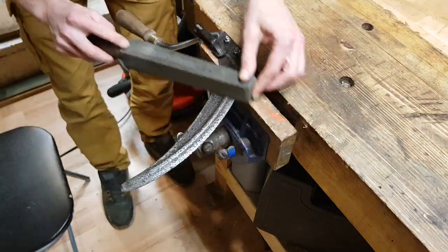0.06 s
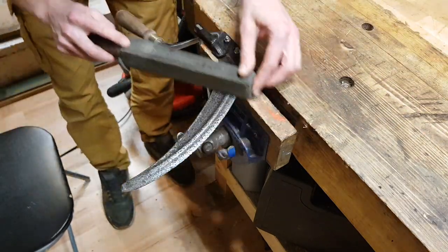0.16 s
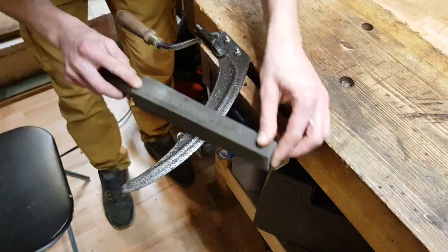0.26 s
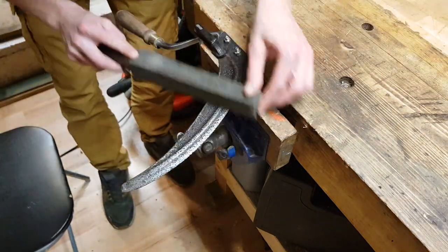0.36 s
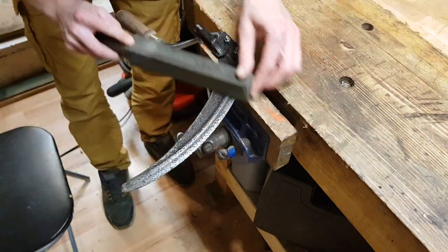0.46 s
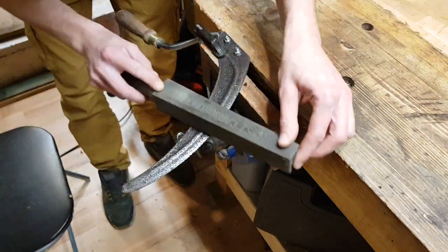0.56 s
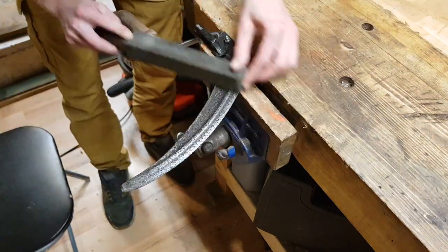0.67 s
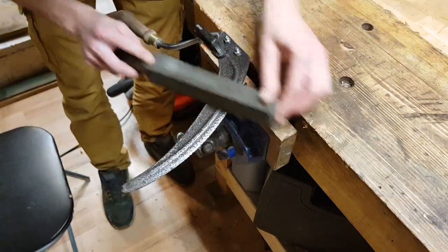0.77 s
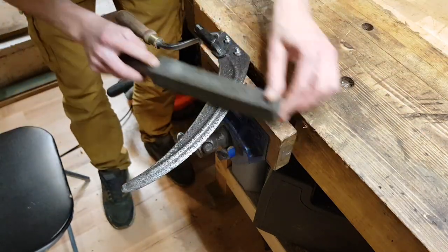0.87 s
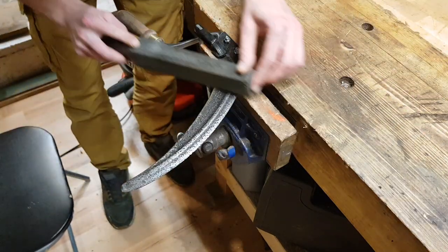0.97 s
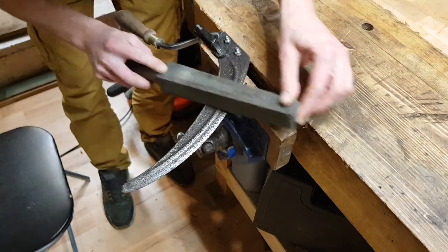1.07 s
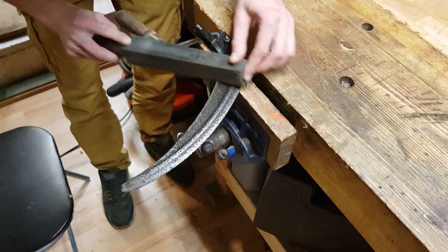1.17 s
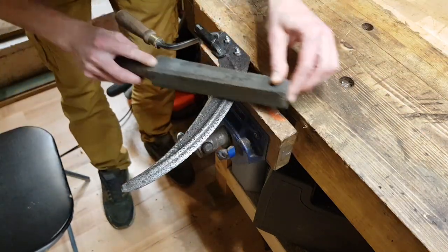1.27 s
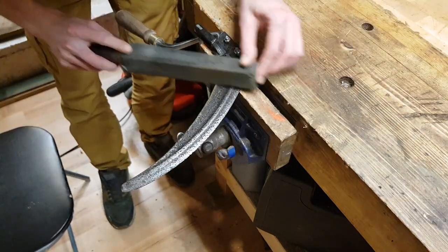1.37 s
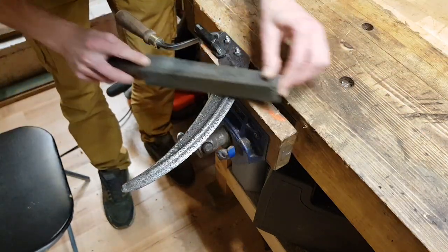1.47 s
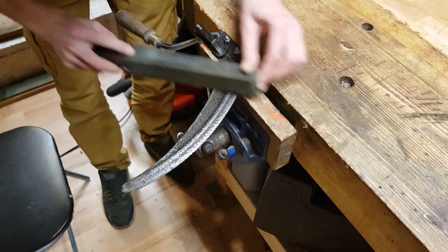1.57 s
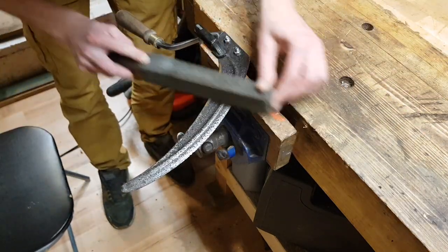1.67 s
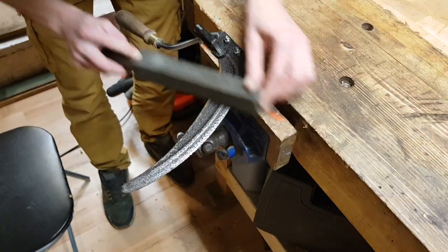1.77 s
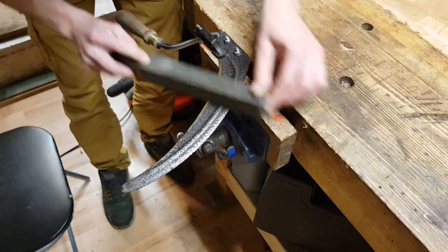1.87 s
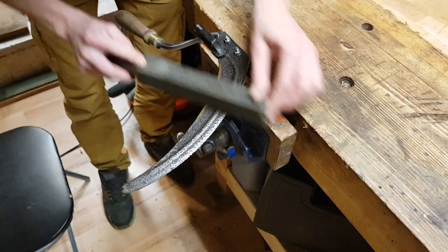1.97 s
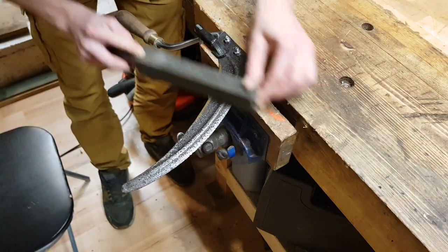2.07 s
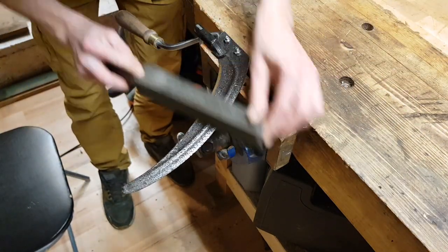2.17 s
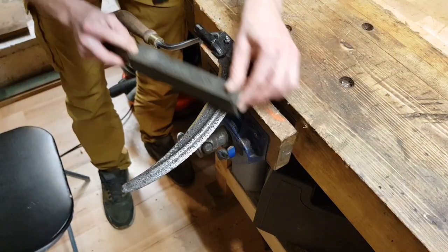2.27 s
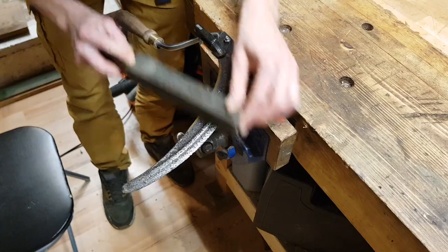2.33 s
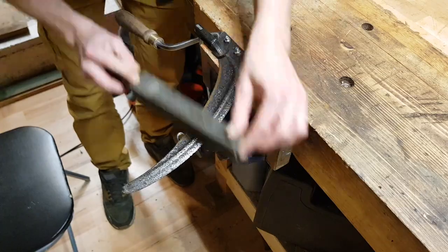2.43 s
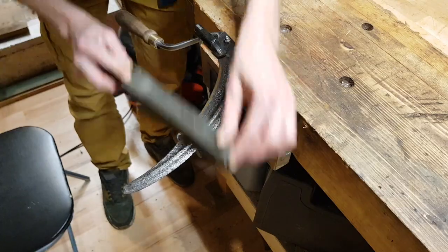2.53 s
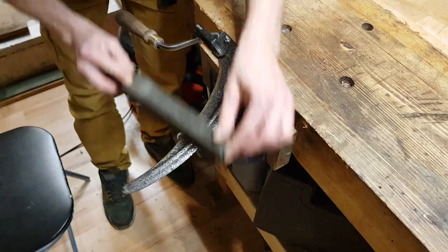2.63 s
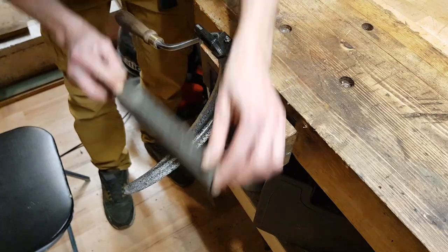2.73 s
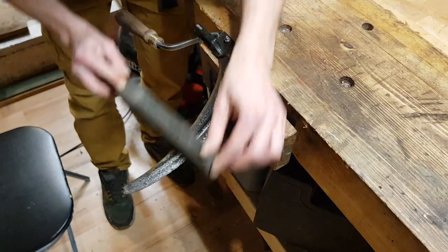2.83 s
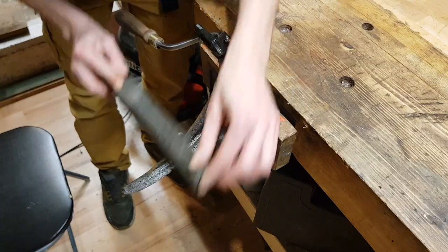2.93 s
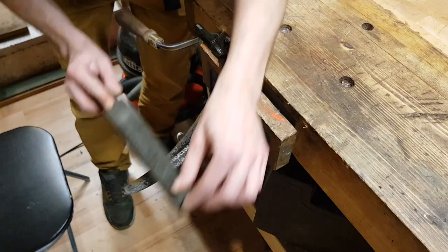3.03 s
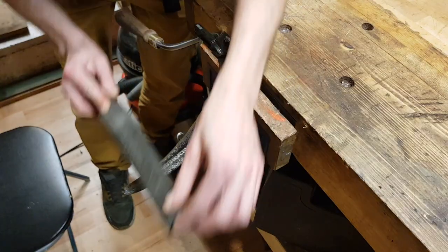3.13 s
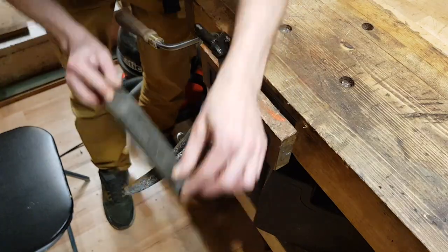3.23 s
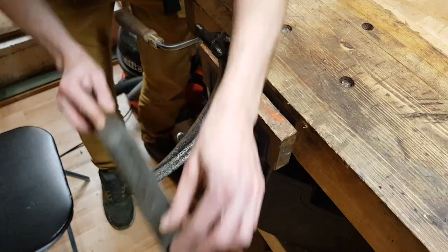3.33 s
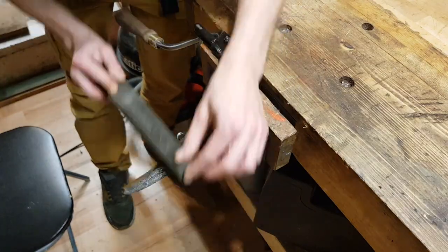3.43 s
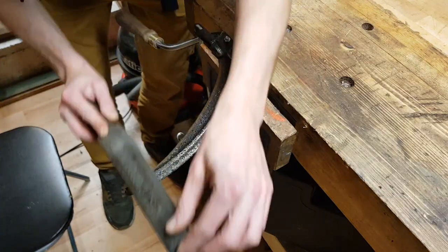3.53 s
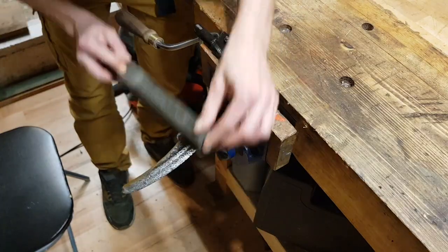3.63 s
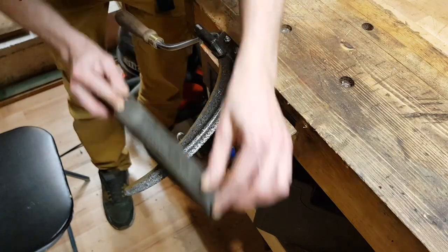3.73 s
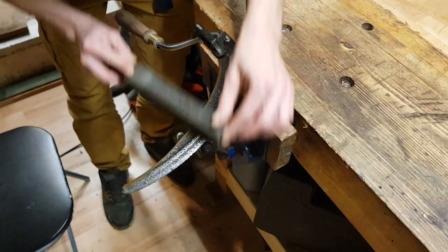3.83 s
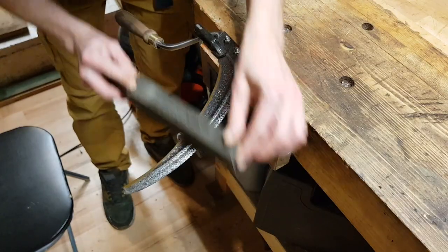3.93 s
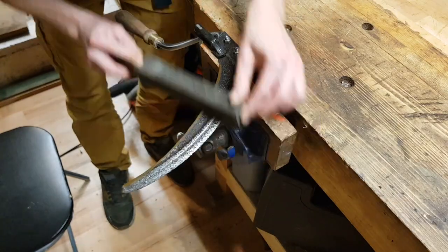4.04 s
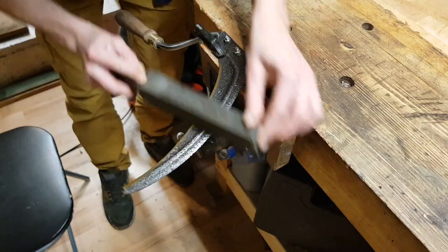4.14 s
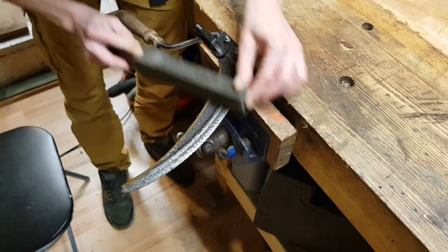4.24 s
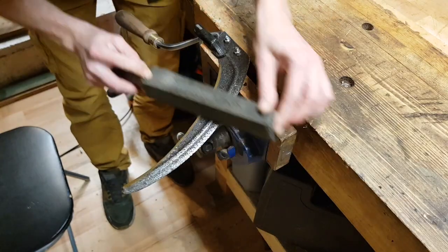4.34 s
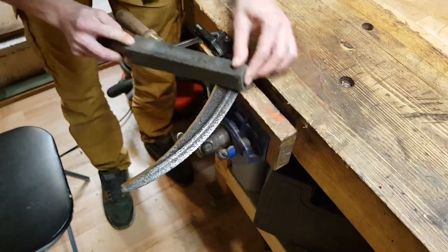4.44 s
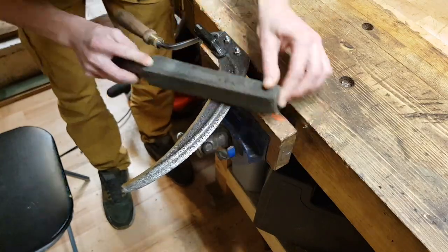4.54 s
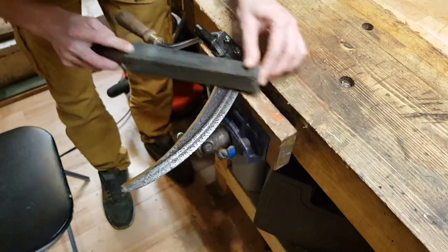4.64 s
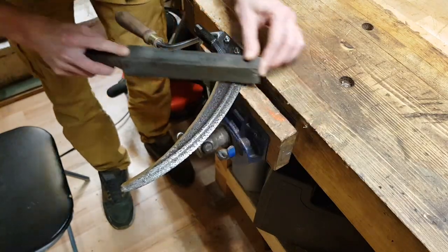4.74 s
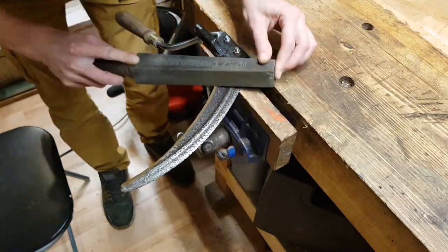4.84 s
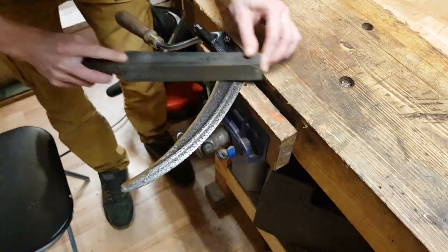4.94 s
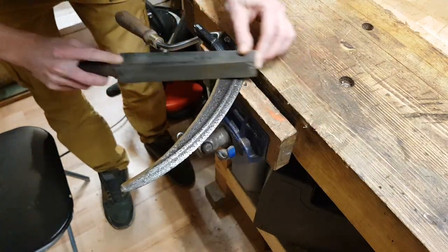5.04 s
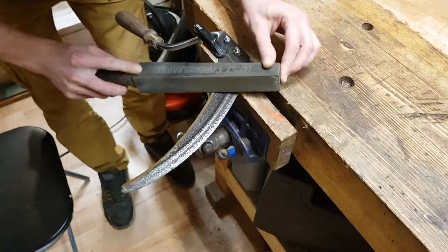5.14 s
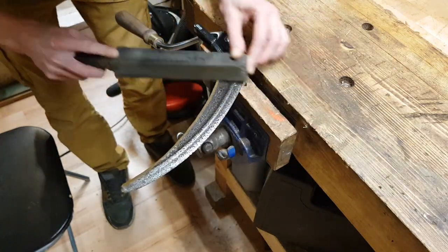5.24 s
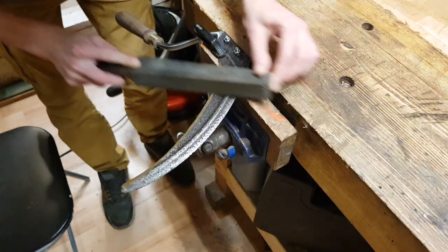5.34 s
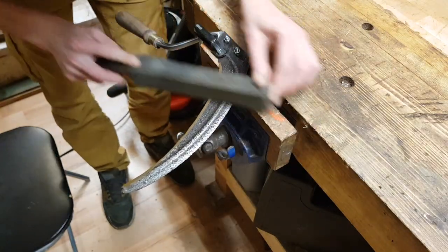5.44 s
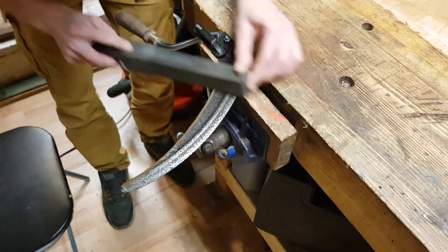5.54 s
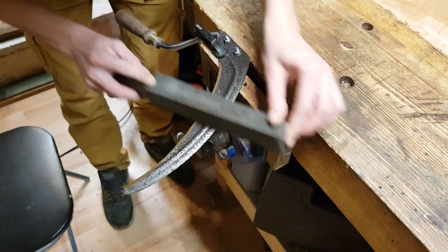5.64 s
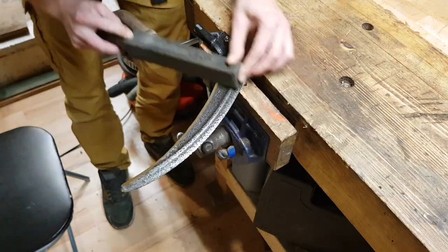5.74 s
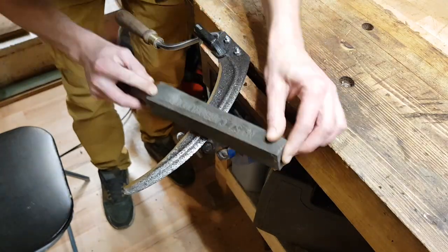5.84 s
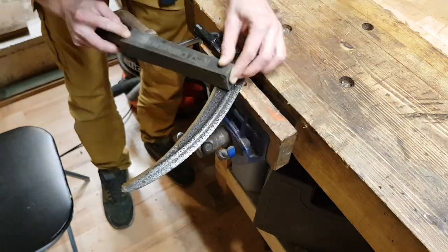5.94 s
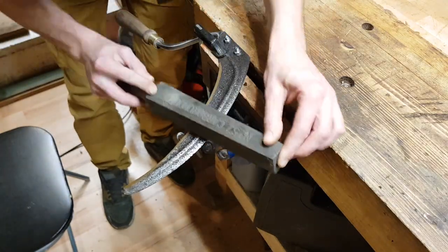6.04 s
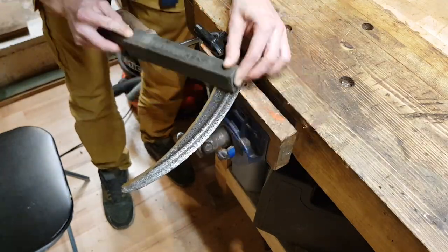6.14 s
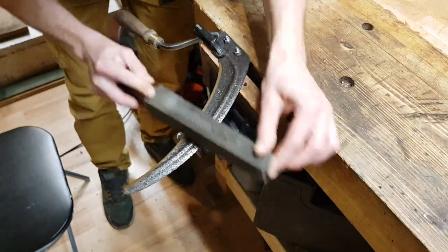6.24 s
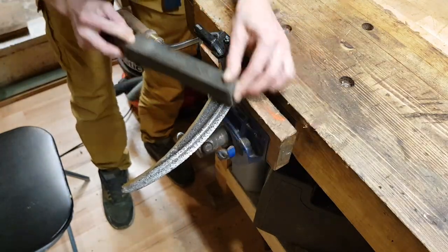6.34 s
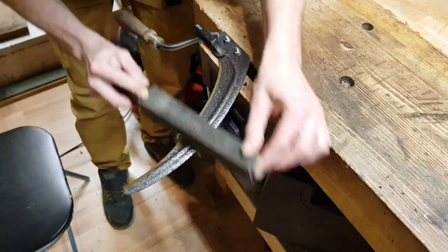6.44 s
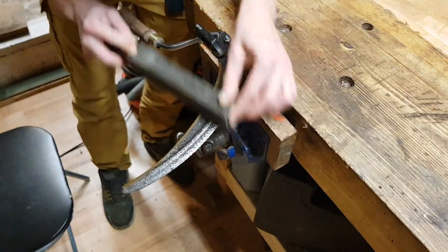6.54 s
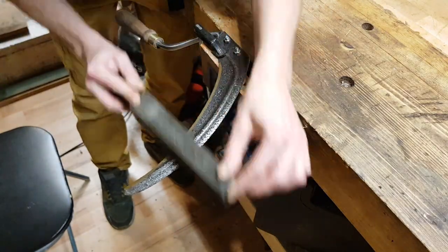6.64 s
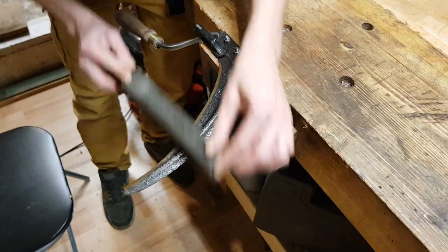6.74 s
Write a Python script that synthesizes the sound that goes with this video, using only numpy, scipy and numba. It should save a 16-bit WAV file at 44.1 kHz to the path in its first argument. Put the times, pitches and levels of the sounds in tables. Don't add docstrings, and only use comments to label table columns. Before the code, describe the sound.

A sharpening stone rasps quickly to and fro on a curved steel blade, bright and gritty, after a couple of small knocks in a quiet workshop.

```python
import sys
import numpy as np
from scipy import signal
from scipy.io import wavfile
from scipy.ndimage import uniform_filter1d
from numba import njit

SR = 44100
rng = np.random.default_rng(int(sys.argv[2]) if len(sys.argv) > 2 else 0)


def gain_from_db(level_db):
    decades = np.asarray(level_db, float) / 20
    return 10 ** decades


def digitize_waveform(pressure):
    field = np.atleast_2d(pressure).T
    bounded = np.clip(field, -1, 1)
    quanta = np.round(bounded * 32767).astype(np.int16)
    wavfile.write(sys.argv[1], SR, quanta)


N = 299880

# multiple of its pitch, level in dB.
OVERHANG_PARTIALS = [(1, 1), (2.22, 2), (3.6, 1)]
# time in seconds, stroke level in dB.
EFFORT = [(.18, -51.5), (.75, -47), (.9, -49), (1.2, -48), (1.35, -51), (1.7, -46), (2.15, -44.5),
          (2.7, -44.5), (3.2, -48.5), (3.6, -44.5), (4.0, -41.7), (4.15, -43.5), (4.4, -43.5), (4.83, -56),
          (5.0, -54), (5.43, -41.5), (6.55, -43), (6.8, -45.5)]
# time in seconds, place on the blade (0 heel, 1 tip),
# overhang pitch at the far turn in Hz.
WORK_PATH = [(.2, 0.43, 1845), (.8, 0.32, 1700), (1.4, 0.015, 1817), (1.7, 0.11, 1387), (1.9, 0.12, 1780),
             (2.26, 0.44, 2100), (2.6, 0.55, 1600), (3.3, 0.88, 1940), (3.8, 0.88, 1850), (4.1, 0.59, 2104),
             (4.25, 0.44, 2097), (4.6, 0.063, 1230), (4.9, 0.073, 984), (5.35, 0.076, 1257),
             (5.75, .25, 1953), (6.1, 0.36, 2106), (6.3, 0.55, 2000), (6.8, 0.6, 2250)]


def sharpening():
    # centre in Hz, width in Hz, level in dB.
    low_modes = [(158.7, 17.6, -20.5), (257, 27, -18.5), (395.3, 19.3, -8), (353, 13, -18), (532, 31, 1),
                 (464, 29, -15), (619, 23, -14)]
    # centre in Hz, width in Hz, level in dB.
    blade_modes = [(645.5, 52, -1.5), (748, 33, -4.5), (803, 38, -0.5), (972, 58, -2)]
    # centre in Hz, width in Hz, level in dB.
    middle_modes = [(1143, 59.6, 1), (1297, 55, -16.5), (1498, 52, -2), (1834, 78, -1.5), (2057, 43, 2.5),
                    (2339, 27, 3.5), (2723, 340, -6.5)]
    # centre in Hz, width in Hz, level in dB.
    upper_modes = [(2810, 450, -12), (3197, 94, 0), (3614, 130, 1.5), (3923, 173, 4.5), (4477, 202, 6.5),
                   (5200, 430, 2)]
    # centre in Hz, width in Hz, level in dB.
    rasp_modes = [(5130, 85, -5.5), (5597, 170, 0.5), (6020, 230, -1.5), (6540, 153, 0), (6883, 530, -1),
                  (7370, 430, -0.5), (7825, 294, -3.5), (8180, 710, -4.5), (8700, 340, -4.5),
                  (9406, 420, -3.5), (10160, 300, -2), (7400, 2980, -8)]
    # centre in Hz, width in Hz, level in dB.
    edge_modes = [(11440, 170, 0.5), (11900, 900, -1), (12920, 500, -6), (13540, 330, 3), (14360, 790, -10),
                  (14630, 1200, 0), (15700, 960, 0)]

    push, pitch_hz, sing, edge = hand()
    sharp, dull = touches()
    t = np.arange(N) / SR
    low = share(t, heel_db=-18.5, tip_db=-11.5, bend=0.26, per_db=0.69)
    blade = share(t, heel_db=-29, tip_db=8.5, bend=3.5, per_db=1.2)
    middle = share(t, heel_db=-18.5, tip_db=7, bend=1.75, per_db=0.77)
    upper = share(t, heel_db=-14, tip_db=6.5, bend=1.2, per_db=0.68)
    force = grit(scatter_db=2.0, clump_db=1.0)
    drag = grit(scatter_db=1.48, clump_db=1.5)
    pressure = np.sqrt(uniform_filter1d(push ** 2, int(0.07 * SR)).clip(0))
    fast = push * (push / (pressure + 1e-9)) ** 0.24
    near = [(multiple * pitch_hz, 8 * sing) for multiple, _ in OVERHANG_PARTIALS]
    lean = pitch_hz / 1300

    rasp_force = force * (push + sharp)
    edge_force = force * (fast * edge + gain_from_db(-1) * sharp)
    upper_force = force * (push * upper + gain_from_db(-6) * sharp + gain_from_db(-33) * dull)
    middle_force = drag * ((0.55 * push + 0.4 * pressure) * middle * gain_from_db(-2.5) + gain_from_db(-15) * dull)
    blade_force = drag * ((0.19 * push + 1.02 * pressure) * blade + gain_from_db(-20) * dull + jolts())
    low_force = drag * ((0.39 * push + 0.72 * pressure) * low + gain_from_db(-23.5) * dull)

    out = ring(rasp_force, rasp_modes, wander_db=3.0, drift=0.013, shift=lean ** 0.13, rate=35)
    out += ring(edge_force, edge_modes, wander_db=0.5, drift=0.013, shift=lean ** 0.05, rate=35)
    out += ring(upper_force, upper_modes, wander_db=2.5, drift=0.016, rate=28, near=near)
    out += ring(middle_force, middle_modes, wander_db=3.0, drift=0.024, rate=25, near=near)
    out += ring(blade_force, blade_modes, wander_db=3.0, drift=0.0055)
    out += ring(low_force, low_modes, wander_db=3.0, drift=0.012, rate=30)
    return out + overhang(pitch_hz, push * sing * 1.3 * lean ** 1.3)


def hand():
    # time in seconds, number of the turn.
    turns = [(.181, 1), (.345, 2), (.491, 3), (.753, 5), (.995, 7), (1.099, 8), (1.214, 9), (1.302, 10),
             (1.49, 12), (2.069, 18), (2.351, 21), (2.737, 25), (2.941, 27), (3.054, 28), (3.141, 29),
             (3.607, 34), (3.722, 35), (3.821, 36), (3.933, 37), (4.323, 41), (4.499, 43), (4.813, 47),
             (5.035, 50), (5.27, 53), (5.437, 55), (5.707, 58), (5.894, 60), (6.28, 64), (6.845, 70)]
    # time in seconds, level against the rasp in dB.
    grip = [(1.5, -36), (1.58, -27), (2.36, -27), (2.5, -36), (3.85, -36), (3.93, -25), (4.5, -24),
            (4.8, -19), (5.4, -23), (6.1, -23), (6.3, -26)]
    near_turn_hz = 874
    lean, lean_fade_s = 0.14, 1.23
    pull_sing_db, pull_edge_db = -2, 1.5

    when, number = np.transpose(turns)
    turn = np.arange(number[0], number[-1] + 1)
    turn_s = np.interp(turn, number, when)
    back = turn % 2 == 0
    work_s, _, far_turn_hz = np.transpose(WORK_PATH)
    effort_db = np.interp(turn_s, *np.transpose(EFFORT))
    turn_hz = np.where(back, np.interp(turn_s, work_s, far_turn_hz), near_turn_hz)
    sing = gain_from_db(np.interp(turn_s, *np.transpose(grip)) + pull_sing_db * back)
    edge = share(turn_s, heel_db=-8, tip_db=6, bend=0.9, per_db=0.16) * gain_from_db(pull_edge_db * back)

    t = np.arange(N) / SR
    k = np.clip(np.searchsorted(turn_s, t) - 1, 0, len(turn_s) - 2)
    u = np.clip((t - turn_s[k]) / (turn_s[k + 1] - turn_s[k]), 0, 1)
    peak = 0.5 + lean * np.exp(-turn_s / lean_fade_s) * (2 * back - 1)
    peak = np.clip(peak, 0.15, 0.85)[k]
    speed = np.sin(np.pi * u ** (np.log(0.5) / np.log(peak)))
    push = np.tanh(1.214 * speed ** 1.554) * gain_from_db(effort_db[k] + 4.0)
    travel = 0.5 * u + (1 - np.cos(np.pi * u)) / 4
    pitch_hz = turn_hz[k] * (turn_hz[k + 1] / turn_hz[k]) ** travel
    return push, pitch_hz, sing[k], edge[k]


def share(t, heel_db, tip_db, bend, per_db):
    firm_db = -44
    work_s, place, _ = np.transpose(WORK_PATH)
    along = np.interp(t, work_s, place).clip(0, 1) ** bend
    lightness_db = firm_db - np.interp(t, *np.transpose(EFFORT))
    return gain_from_db(heel_db + tip_db * along + per_db * lightness_db)


def grit(scatter_db, clump_db):
    slips = rng.standard_normal(N) * gain_from_db(scatter_db * rng.exponential(size=N))
    return unit(slips * gain_from_db(clump_db * walk(400) + 2.03 * walk(60)))


def ring(force, modes, wander_db, drift, shift=1, rate=18, near=()):
    out, power = 0, 0
    for hz, width_hz, db in modes:
        centre_hz = np.minimum(hz * shift * (1 + drift * walk(20)), 0.45 * SR)
        lift = 1 + sum(gain * np.exp(-(np.log(pitch_hz / hz) / 0.07) ** 2) for pitch_hz, gain in near)
        drive = force * lift * gain_from_db(db + wander_db * walk(rate))
        out = out + svf(drive, centre_hz, 2.0 * width_hz)
        power += gain_from_db(2 * db) * np.pi * width_hz / SR
    return out / np.sqrt(power)


def overhang(pitch_hz, gain):
    out = 0
    for multiple, db in OVERHANG_PARTIALS:
        partial_hz = multiple * pitch_hz * (1 + 0.022 * walk(150))
        phase = 2 * np.pi * np.cumsum(partial_hz) / SR
        out = out + gain * gain_from_db(db - 2.5 + 3.5 * walk(55)) * np.sin(phase)
    return out


def jolts():
    # start in seconds, peak in dB, ring T60 in seconds.
    tip_jolts = [
        (3.17, -58, 0.15),
        (3.56, -56, 0.24),
        (3.78, -55, 0.14),
        (6.6, -59.5, 0.23),
    ]
    t = np.arange(N) / SR
    out = 0
    for start_s, db, t60_s in tip_jolts:
        rise = np.clip((t - start_s) / 0.008, 0, 1)
        out = out + rise * gain_from_db(db - 60 * np.maximum(t - start_s, 0) / t60_s)
    return out


def touches():
    # start in seconds, peak in dB, ring T60 in seconds, low share in dB.
    contacts = [
        (0.027, -58.5, 0.8, 12.5),
        (0.086, -46.5, 0.14, 8),
        (.104, -43, 0.11, 0.5),
        (0.133, -41.5, 0.064, -3),
    ]
    t = np.arange(N) / SR
    sharp, dull = 0, 0
    for start_s, db, t60_s, low_db in contacts:
        rise = np.clip((t - start_s) / 0.0017, 0, 1)
        fade = rise * gain_from_db(db - 11 - 60 * np.maximum(t - start_s, 0) / t60_s)
        sharp = sharp + fade * gain_from_db(-low_db)
        dull = dull + fade * gain_from_db(low_db)
    return sharp, dull


def unit(x):
    return x / np.sqrt(np.mean(x ** 2))


def walk(rate):
    hold = int(SR / rate)
    steps = np.repeat(rng.standard_normal(N // hold + 1), hold)
    return 1.163 * uniform_filter1d(uniform_filter1d(steps, hold), hold)[:N]


@njit
def svf(x, hz, width):
    y = np.empty(len(x))
    band1, low1, band2, low2 = 0., 0., 0., 0.
    for i in range(len(x)):
        g = np.tan(np.pi * hz[i] / SR)
        k = width / hz[i]
        v = (band1 + g * (x[i] - low1)) / (1 + g * (g + k))
        band1, low1 = 2 * v - band1, low1 + 2 * g * v
        w = (band2 + g * (k * v - low2)) / (1 + g * (g + k))
        band2, low2 = 2 * w - band2, low2 + 2 * g * w
        y[i] = k * w
    return y


def workshop(x):
    t60_s = 0.45
    t = np.arange(int(0.4 * SR)) / SR
    noise = rng.standard_normal(len(t))
    dull = signal.lfilter([0.2], [1, -0.8], noise) * gain_from_db(-60 * t / t60_s)
    bright = 0.027 * noise * gain_from_db(-60 * t / (0.5 * t60_s))
    tail = (t > 0.004) * (dull + bright)
    return signal.fftconvolve(x, tail / np.sqrt(np.sum(tail ** 2)))[:N]


def building_rumble():
    noise = svf(rng.standard_normal(N), np.full(N, 100.), 99.0)
    return unit(noise) * gain_from_db(-96.5 + 2.3 * walk(4.8))


def scene():
    room_db, hiss_db = -20.5, -99
    dry = sharpening()
    hiss = gain_from_db(hiss_db) * rng.standard_normal(N)
    return (dry + gain_from_db(room_db) * workshop(dry) + building_rumble() + hiss)[None]


def low_pass(x):
    return signal.sosfilt(signal.butter(12, 16450, fs=SR, output="sos"), x)


def record(dry):
    bass_cut = signal.butter(2, 120, "high", fs=SR, output="sos")
    top_cut = signal.ellip(12, 0.3, 60, 15850, fs=SR, output="sos")
    mix = signal.sosfilt(top_cut, signal.sosfilt(bass_cut, dry))
    return low_pass(mix)


dry = scene()
out = record(dry)
digitize_waveform(out)
```